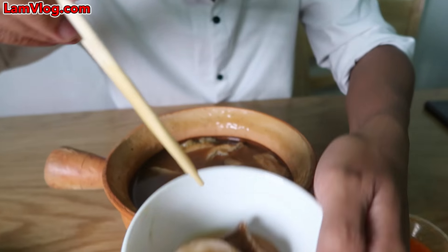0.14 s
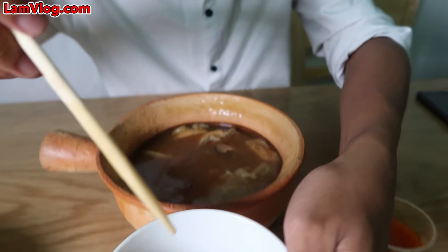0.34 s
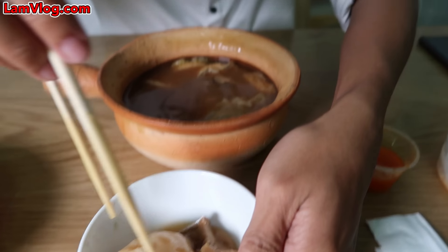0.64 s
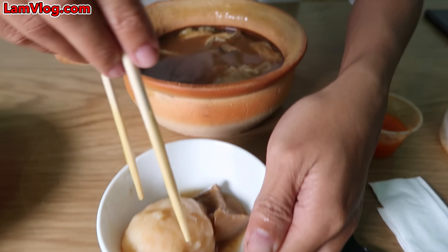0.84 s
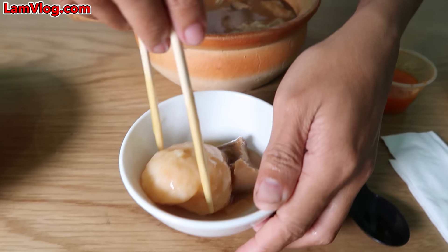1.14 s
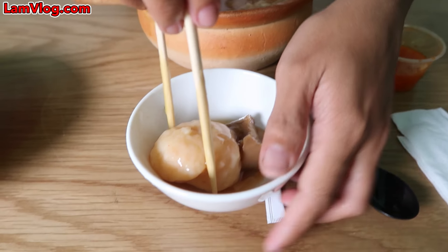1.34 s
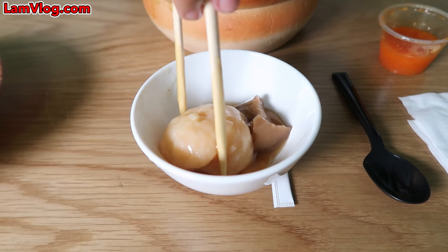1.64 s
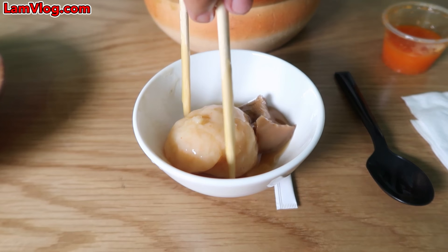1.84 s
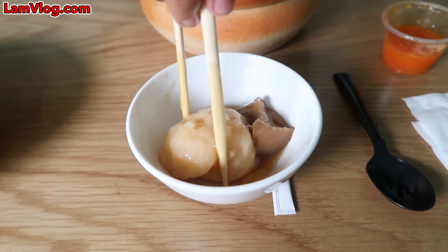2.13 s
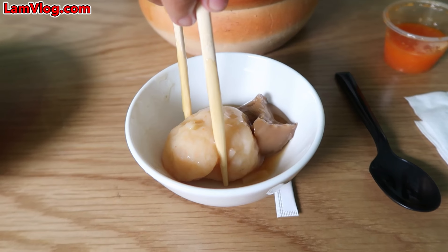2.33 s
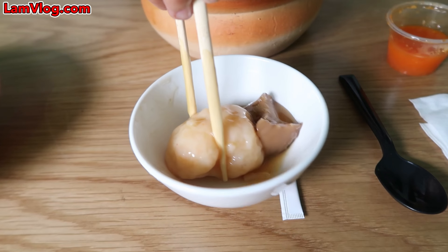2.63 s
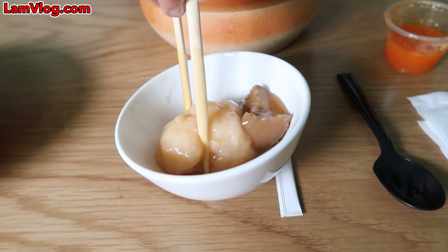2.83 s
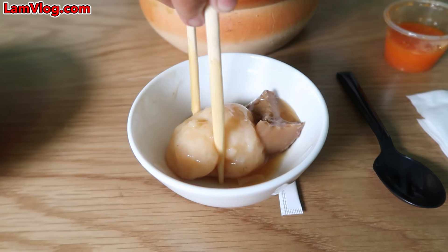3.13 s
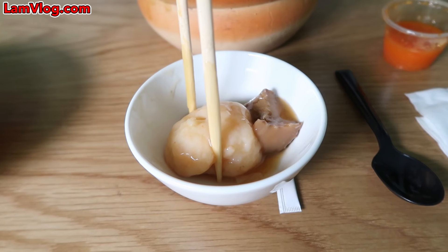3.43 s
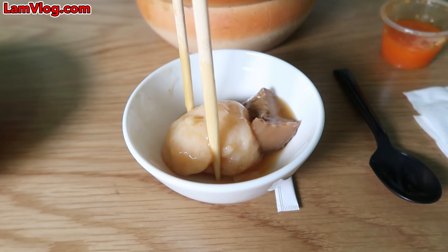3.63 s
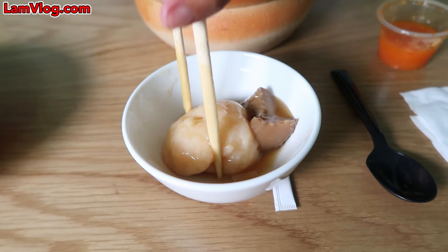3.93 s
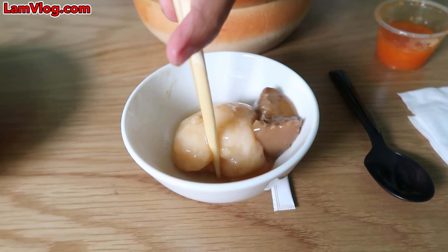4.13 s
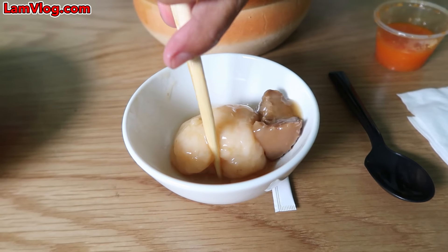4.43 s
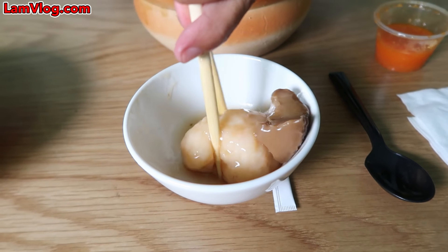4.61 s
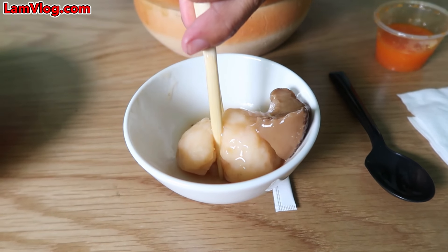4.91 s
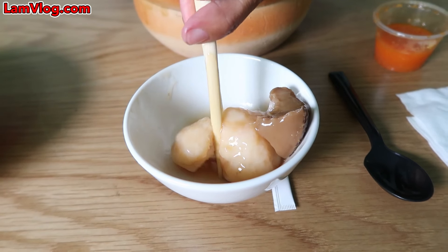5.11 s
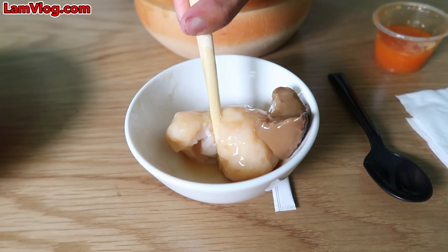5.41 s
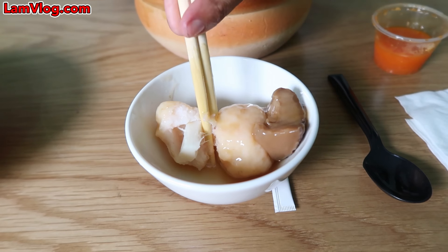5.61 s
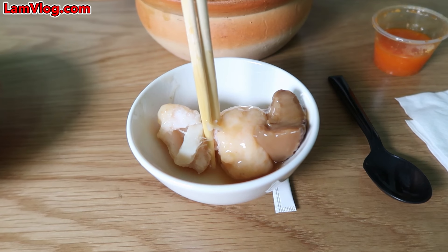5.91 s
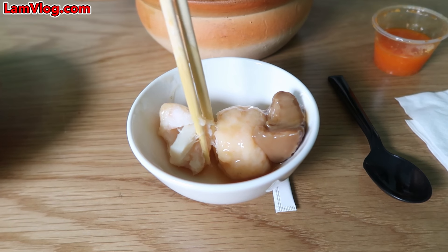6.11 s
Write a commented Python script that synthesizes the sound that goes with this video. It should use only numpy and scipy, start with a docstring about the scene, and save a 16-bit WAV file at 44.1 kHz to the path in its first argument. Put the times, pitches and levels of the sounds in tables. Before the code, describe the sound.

Indoors, close to a wooden table, hiss and a low hum lie under the high, even chirps of a distant insect. A ceramic bowl lands with a hollow thud and settles in a few smaller knocks. After a lull it bumps the table again, sharply. Then wooden chopsticks tick, clatter and briefly scrape against the glaze while the bowl taps lightly on the table.

```python
"""Indoors, a camera's stereo microphone close to a wooden table. From the start there is hiss and a
low hum, and an insect far outside clicks its wings in four chirps a second. Half a second in, a ceramic
bowl is set down and rocks: the table top booms, the room rings on, chopsticks tick on the glaze.
The bowl knocks again around three seconds; after the loudest knocks the camera briefly lowers its gain.
From about five seconds the chopsticks clatter and skid in the bowl, among lighter knocks."""
import sys
import numpy as np
from scipy import signal
from scipy.fft import rfft, irfft, next_fast_len
from scipy.io import wavfile
from scipy.ndimage import uniform_filter1d, minimum_filter1d

SR = 44100
rng = np.random.default_rng(int(sys.argv[2]) if len(sys.argv) > 2 else 0)


def persist_wave(psi):
    """Save psi, clipped to +-1, as 16-bit WAV."""
    counts = np.round(np.clip(psi, -1, 1) * 32767).astype(np.int16)
    wavfile.write(sys.argv[1], SR, np.atleast_2d(counts).T)


N = 275972
T = np.arange(N) / SR
SIZE = next_fast_len(2 * N)
HZ = np.maximum(np.arange(SIZE // 2 + 1) * SR / SIZE, 1)

# Stereo width of far sound, side against mid: freq_hz, gain_db
SIDE_GAIN = [(60, -40), (290, -7), (640, -3.5), (1400, -2), (3100, -2), (8000, 0.5)]
# Spectrum of the hiss: freq_hz, density_db
HISS_TONE = [(15, -50.5), (25, -7), (120, 1.5), (293, -3.5), (503, -14), (695, -13.5), (988, -19),
             (1370, -20.5), (3600, -25.5), (5140, -29.5), (6560, -32), (13200, -42.5), (16000, -76)]
# Bands of the hum: centre_hz, width_hz, relative_db
HUM_BANDS = [(85.2, 11, -9.5), (131.4, 20.4, -7.5), (208, 120, -21.5), (310, 34, -23)]
# Slow swell of the hum: time_s, level_db
HUM_LEVEL = [(0.0, -51.5), (0.4, -42.5), (0.9, -42.5), (1.6, -49.5), (3.1, -53), (3.6, -54.5), (4.2, -50),
             (5.5, -52), (6.26, -49.5)]
# Insect outside: peak_s, level_db
INSECT_CHIRPS = [(-.06, -59), (.183, -63.5), (.425, -61.5), (0.676, -62.5), (.919, -63), (1.165, -65.5),
                 (1.42, -64), (1.655, -63), (1.893, -62.5), (2.14, -62.5), (2.39, -62.5), (2.623, -66.5),
                 (2.865, -66), (3.107, -64), (3.33, -80), (3.66, -78), (3.874, -68), (4.113, -64.5),
                 (4.375, -63.5), (4.62, -63.5), (4.87, -62.5), (5.12, -61), (5.368, -63), (5.61, -62),
                 (5.855, -63.5), (6.095, -62), (6.34, -66)]
# Its wing resonances: pitch_hz, level_db, t60_s
WING_MODES = [(4150, -9, .026), (4300, -2.5, .027), (4510, 0, .027)]
# The table jolted or leaned on: start_s, pitch_hz, level_db
TABLE_WOBBLES = [(0.452, 72.3, -37), (.85, 68.7, -35.5), (2.56, 52, -48), (2.819, 32.2, -40),
                 (2.852, 66.4, -38.5), (3.98, 32, -47), (4.43, 30.2, -38.5), (5.59, 32, -45),
                 (5.588, 73, -38)]
# Bowl foot on wood: start_s, level_db, pitch_hz, contact_ms (for a 0 dB blow),
# top_db, room_db (both relative to the blow), room_cutoff_hz
BOWL_KNOCKS = [(0.47, -33, 334, 0.31, 1, 5, 6000), (0.8283, 3, 394, 1.29, -3.5, 1.5, 1530),
               (0.933, -16, 630, 0.98, -26, 1, 3000), (1.122, -19, 270, 3.04, 4, 8, 3000),
               (1.231, -17.5, 272, 2.2, -12.5, 2, 3020), (1.3846, -14, 482, 1.2, -3.5, 1.5, 1500),
               (1.406, -24, 520, 1.5, -3, -10, 1500), (2.8168, -9, 315, 3.94, 2.5, 2.5, 1500),
               (2.8266, -25, 280, 2.2, -5, -6.5, 1510), (3.1875, -16, 191, 1.04, 11.5, 10.5, 3000),
               (3.1967, 0.5, 393, 0.63, -2, -7.5, 2500), (3.2027, -9, 368, 0.47, 1.5, 7.5, 2170),
               (4.429, -30, 325, 1.65, 12.5, 7, 3000), (4.865, -20, 173, 2.14, 4.5, -1, 3000),
               (4.877, -30, 302, 2, -5, -3, 3000), (4.886, -22, 340, 2.5, 5, -5, 3000),
               (5.073, -23, 350, 2, 2, -11, 3000), (5.14, -35, 358, 1.1, -8, -13, 3000),
               (5.582, -29, 363, 0.62, 7, 1.5, 6000), (5.601, -26.5, 200, 0.6, 10, 1, 6000),
               (5.607, -31, 250, 0.76, 8.5, 3, 3000), (5.673, -28, 190, 1.9, -8, 2, 3000),
               (5.688, -26, 190, 2.1, -16, 9, 3000), (5.7151, -23.5, 298, 2.6, 5, 3, 3000),
               (5.727, -25, 284, 1.4, -9, 5, 3000), (5.769, -36.5, 203, 0.56, 8, 5, 6000),
               (5.793, -38.5, 280, 0.29, 4.5, 0, 6060)]
# Long resonances of the table top: pitch_hz, level_db, t60_s
TOP_MODES = [(163, -8, 0.35), (220.7, -11, 0.72), (301, -9.5, 0.5), (336.4, 3.5, 0.56), (426, -12, 0.3),
             (548.7, 6.5, 0.3), (699, -12, 0.83), (869, -6, 0.3), (880, -4, 0.62), (1002, 0.5, 0.2),
             (1071, -0.5, 0.37), (1237, -4.5, 0.34), (1373, 1, .3), (1624, 2, 0.28)]
# Colour of a knock as top and room give it back: freq_hz, gain_db
ROOM_SEND_TONE = [(50, -37), (120, -12.5), (200, -4.5), (340, -2.5), (560, 0.5), (900, -9), (1600, -7),
                  (2500, -5), (3600, -8), (5500, -53.5), (12000, -54)]
# Decay of the room: freq_hz, t60_s
ROOM_DECAY = [(100, 0.6), (300, 0.48), (1000, 0.57), (2000, 0.6), (3500, 0.45), (7000, 0.24), (14000, 0.2)]
# Tip or foot on the glaze: start_s, level_db, pitch_hz, overtone_db, edge_hz, edge_db, bowl_db
# (the last three levels relative to the tick)
GLAZE_TICKS = [(0.829, -26, 1380, -11, 5700, -27, -55.5), (0.829, -29, 2450, -14, 4100, -16, -52),
               (0.933, -33, 1000, -10, 6850, -40, -52), (1.122, -52, 2100, 2, 6830, -30, -50),
               (1.728, -51, 2640, 2, 6000, -2, -38), (2.3635, -72, 2700, 5, 9000, 12, -60),
               (2.8175, -40, 1260, -11, 6850, -40, -52), (3.189, -50, 2560, -1, 6900, 2.5, -37),
               (3.1961, -16, 1310, -5, 6750, -31, -41), (3.197, -27, 2530, -22, 6800, -34.5, -40),
               (3.201, -53.5, 2050, -2, 6850, -0.5, -24), (3.29, -62, 2480, -3, 6000, 2, -50),
               (3.613, -43.5, 2720, -5, 6850, -32, -51), (4.6864, -74, 2930, -3, 6850, 16, -10),
               (4.865, -30.5, 1870, -5.5, 7140, -8.5, -19), (4.8766, -34, 1880, -3, 6640, -7.5, -32),
               (4.8854, -37, 1950, -3, 6900, -8, -13), (4.958, -75, 2500, -3, 10500, 12, -40),
               (4.9682, -54, 1460, -3, 6200, 0, -34), (5.041, -41.5, 2100, 5, 6200, 0, -42),
               (5.072, -46, 1100, 5, 10500, -11, -40), (5.1864, -50, 2620, -1, 6850, -16, -20),
               (5.2185, -47.5, 2850, 2, 6850, -15, -23), (5.3035, -38, 1320, -15, 6850, -35, -28),
               (5.304, -36, 2740, -15, 6850, -30, -38), (5.3105, -40, 2080, -2, 6850, -30, -22),
               (5.321, -41, 2620, -15, 6850, -30, -23), (5.33, -53, 2000, -3, 6850, -30, -25),
               (5.5505, -47.5, 2050, 2, 10000, -7, -12), (5.5614, -49, 2220, 0, 7500, 0, -27),
               (5.5763, -45, 2050, 2, 10500, 3, -20), (5.581, -40, 3150, -5, 9500, -10, -30),
               (5.77, -33, 2170, -11, 6740, 0.5, -34), (5.7774, -40, 1980, -3, 6500, 0, -29),
               (5.794, -37.5, 1880, -4, 7200, -1, -28), (5.804, -44, 1890, 2, 6850, -2, -40),
               (6.22, -46, 2780, -7, 6850, -25, -19)]
# Bright crack of a tick: edge_ratio, level_db, t60_s
EDGE_MODES = [(1, 7.5, 0.0028), (1.42, 1, 0.003), (1.8, -5, 0.0025), (.56, -3, 0.003)]
# Ring of the bowl wall: pitch_hz, level_db, t60_s
BOWL_MODES = [(1012, -8, .06), (2159, 7, .12), (2800, -5, .025), (1350, -5, .03)]
# A tip sliding on the glaze: start_s, length_s, level_db, treble_db_per_octave
TIP_SKIDS = [(5.306, 0.068, -58, -15), (5.5823, 0.0043, -35, -4.5), (5.5911, 0.007, -33.5, 4)]
# Spectrum of that friction: freq_hz, density_db
FRICTION_TONE = [(470, -31), (800, -9), (1300, -12), (2050, -4.5), (3300, -13), (4800, -13.5), (5940, -17),
                 (8440, -14.5), (16000, -28)]


def undb(db):
    """Gain of a dB value."""
    return 10 ** (np.asarray(db) / 20)


def level(x, db):
    """Scales to an rms level."""
    return x * undb(db) / np.sqrt(np.mean(x ** 2))


def shape(x, gain):
    """Filters by a response given at every frequency."""
    return irfft(rfft(x, SIZE) * gain, SIZE)[..., :N]


def over_hz(points, at_hz=HZ):
    """Reads a (Hz, value) table along a log frequency axis."""
    hz, values = np.transpose(points)
    return np.interp(np.log(at_hz), np.log(hz), values)


def ring(modes, seconds):
    """Response of (Hz, dB, t60) modes to a tap."""
    t = T[:int(seconds * SR)]
    return sum(undb(db - 60 * t / t60) * np.sin(2 * np.pi * hz * t) for hz, db, t60 in modes)


def add(track, start_s, sound):
    """Mixes a sound in at a time."""
    i = int(start_s * SR)
    track[i:i + len(sound)] += sound[:N - i]


def walk(rate_hz):
    """Random steps, smoothed twice; spread near 1."""
    k = int(SR / rate_hz)
    steps = np.repeat(rng.standard_normal(N // k + 1), k)
    return 1.3 * uniform_filter1d(uniform_filter1d(steps, k), k)[:N]


def wide(mid, side, side_db=0):
    """Left and right of a sound from all around; both microphone ports hear the same bass."""
    side = shape(side, undb(over_hz(SIDE_GAIN) + side_db))
    return np.array([mid + side, mid - side])


def background():
    """Room tone: smooth hiss, a hum of wavering narrow bands, a deep rumble that comes and goes."""
    hiss = level(wide(*shape(rng.standard_normal((2, N)), undb(over_hz(HISS_TONE)))), db=-52)
    hum = 0
    for hz, width_hz, db in HUM_BANDS:
        band = shape(rng.standard_normal(N), 1 / (1 + (2 * (HZ - hz) / width_hz) ** 2))
        hum += level(band, db) * undb(2.2 * walk(6))
    hum *= undb(np.interp(T, *np.transpose(HUM_LEVEL)))
    rumble = level(shape(rng.standard_normal(N), 1 / (1 + ((HZ - 38) / 16) ** 4)), db=-65)
    return hiss * undb(.7 * walk(2.86)) + hum + rumble * undb(4 * walk(5.04))


def insect(clicks_per_s=215, throb_hz=85, rise_s=.078, fall_s=.062):
    """Far outside, quick wing clicks throb; each chirp swells slowly and falls faster."""
    jitter, strength = rng.standard_normal((N // 150, 2)).T
    at = np.cumsum(SR / clicks_per_s * (1 + .15 * jitter)).astype(int)
    clicks = np.zeros(N)
    clicks[at[at < N]] = undb(2.5 * strength)[at < N]
    throb_cycles = np.cumsum(throb_hz * (1 + .08 * walk(12))) / SR
    throb = undb(2.2 * np.sin(2 * np.pi * throb_cycles))
    swell = undb(-84)  # faint buzz between chirps
    for peak_s, db in INSECT_CHIRPS:
        slope_s = np.where(T < peak_s, rise_s, fall_s)
        swell += undb(db) * np.exp(-np.abs((T - peak_s) / slope_s) ** 1.64)
    scrape = np.hanning(100) * np.sin(2 * np.pi * 4410 * T[:100])
    stroke = np.convolve(ring(WING_MODES, .05), scrape)
    song = level(shape(clicks, rfft(stroke, SIZE)) * throb, 2.77) * swell
    # at this distance much of it arrives by scattered paths
    paths = rng.standard_normal((2, 8000)) * undb(-60 * T[:8000] / .25)
    return .94 * song + wide(*shape(song, undb(-32) * rfft(paths, SIZE)))


def wobbles(rise_s=.011, fall_s=.074):
    """Deep sways of the table that swell and die within a few cycles."""
    out = np.zeros(N)
    t = T[:SR // 2]
    envelope = (1 - np.exp(-t / rise_s)) * np.exp(-t / fall_s)
    for start_s, hz, db in TABLE_WOBBLES:
        add(out, start_s, undb(db) * envelope * np.sin(2 * np.pi * hz * t))
    return out


def knocks(onset_delay_s=.00042):
    """Each blow of the bowl thuds and rings the table top; gives the close sound and the room's feed."""
    thud, top, to_room = np.zeros((3, N))
    for start_s, db, hz, full_contact_ms, top_db, room_db, cutoff_hz in BOWL_KNOCKS:
        # elastic contact: weaker blows last longer and sound duller
        contact_ms = full_contact_ms * undb(-db / 5)
        push = np.exp(-T[:300] * 5000 / contact_ms)
        push = np.convolve(push, push) / push.sum() ** 2
        low_modes = [(hz, 0, .022), (2.064 * hz, -5, .015), (2.92 * hz, -10, .012), (2.6 * hz, -16, .01)]
        high_modes = [(1060, -14.5 + db / 2, .03), (1650, -9 + db / 2, .02)]
        dull_push = signal.lfilter(*signal.butter(2, cutoff_hz, fs=SR), push)
        onset_s = start_s + onset_delay_s  # the thud sounds a moment after the listed start
        add(thud, onset_s, undb(db) * np.convolve(push, ring(low_modes + high_modes, .06)))
        add(top, onset_s, undb(db + top_db) * push)
        add(to_room, onset_s, undb(db + room_db) * dull_push)
    # a small top radiates no deep bass
    thud = signal.sosfilt(signal.butter(3, 150, "high", fs=SR, output="sos"), thud)
    boom = shape(top, undb(-27) * rfft(ring(TOP_MODES, 1.2), SIZE))
    return thud + boom, shape(to_room, undb(over_hz(ROOM_SEND_TONE)))


def room(x, gap_s=.0011, build_s=.0089):
    """Dense echoes after a short gap, each octave dying at its own rate."""
    noise, tail = rng.standard_normal((2, N)), 0
    for hz in 60 * 2. ** np.arange(9):
        octave = shape(noise, np.clip(1 - np.abs(np.log2(HZ / hz)), 0, 1))
        widen_db = np.array([[0], [6]]) * np.clip(np.log2(hz / 500), 0, 2)  # more side in the treble
        tail += octave * undb(widen_db - 60 * T / over_hz(ROOM_DECAY, hz))
    tail *= np.clip((T - gap_s) / build_s, 0, 1)
    return wide(*shape(x, rfft(tail, SIZE)), side_db=-22.5)


def ticks():
    """A tick rings the chopstick briefly, cracks at the tip and sets the bowl wall ringing."""
    out = np.zeros(N)
    soft_push = np.hanning(14) / 6.5  # wood yields
    for start_s, db, hz, overtone_db, edge_hz, edge_db, bowl_db in GLAZE_TICKS:
        chatter = rng.standard_normal(260) * undb(-17 - 60 * T[:260] / .012)
        landing = np.append(1, chatter)
        edge = ring([(min(k * edge_hz, 15000), mode_db, t60) for k, mode_db, t60 in EDGE_MODES], .03)
        edge *= np.minimum(T[:len(edge)] / .0003, 1)
        stick = ring([(.72 * hz, -9, .014), (hz, 0, .018), (1.35 * hz, overtone_db, .012)], .05)
        add(out, start_s, undb(db + bowl_db) * ring(BOWL_MODES, .3))
        add(out, start_s, undb(db + edge_db) * np.convolve(landing, edge))
        add(out, start_s, undb(db) * np.convolve(np.convolve(landing, soft_push), stick))
    # a thin stick radiates no bass, and the very top is lost
    return shape(out, 1 / (1 + (HZ / 15000) ** 12) / (1 + (800 / HZ) ** 4))


def gain_duck(x, threshold=.29, window_s=.0094, hold_s=.16, slew_s=.087):
    """The camera's gain cut, 0-1: the share of a short window over the threshold, held and slewed."""
    share = uniform_filter1d(1. * (x > threshold), int(window_s * SR))
    hold = int(hold_s * SR)
    held = -minimum_filter1d(-share, hold, origin=(hold - 1) // 2)
    step = 1 / (slew_s * SR)
    return signal.lfilter([step], [1, step - 1], held)


def skids(attack_s=.0003, release_s=.0005, trail_s=.014):
    """Dense uneven slips of wood on glaze: a quick rise, a hold, a quick fall with a faint trail."""
    slips = rng.standard_normal(N) * undb(2 * rng.exponential(1, N)) * (rng.random(N) < .4)
    out = 0
    for start_s, length_s, db, tilt_db in TIP_SKIDS:
        rise = np.exp(np.minimum(T - start_s, 0) / attack_s)
        after_s = np.maximum(T - start_s - length_s, 0)
        fall = np.exp(-after_s / release_s) + undb(-19) * np.exp(-after_s / trail_s)
        tone_db = over_hz(FRICTION_TONE) + tilt_db * np.log2(np.maximum(HZ / 3000, 1))
        out += level(shape(slips, undb(tone_db)), db) * rise * fall
    return out


def off_axis(x, lag_s=1.1e-5, tilt_db=1.6):
    """The bowl stands off centre: the right port hears it later, and louder around 1500 Hz."""
    right_db = tilt_db / 2 / (1 + (np.log2(HZ / 1500) / .74) ** 4)
    right = undb(right_db) * np.exp(-1j * np.pi * HZ * lag_s)
    return shape(x, np.array([1 / right, right]))


def scene():
    """At the microphone: bowl and chopsticks close, the room around, the insect far off."""
    thuds, to_room = knocks()
    sticks = ticks() + skids()
    echoes = room(undb(-2.5) * to_room + undb(-42) * sticks)
    return off_axis(thuds + sticks) + echoes + insect() + wobbles() + background()


def record(dry, full_duck_db=-16.5, top_hz=15700):
    """The camera ducks its gain after loud knocks, rounds the peaks and cuts the highest treble."""
    duck = gain_duck(np.abs(dry).max(axis=0))
    rounded = np.tanh(1.49 * dry * undb(full_duck_db * duck))
    return signal.sosfilt(signal.ellip(8, .2, 70, top_hz, fs=SR, output="sos"), rounded)


dry = scene()
out = record(dry)
persist_wave(out)
```